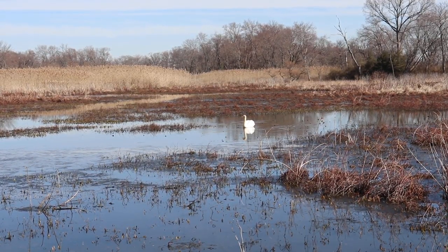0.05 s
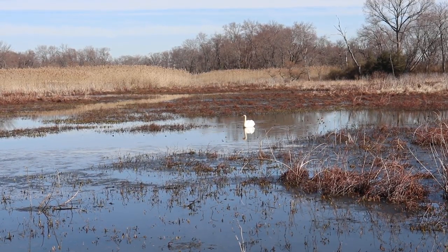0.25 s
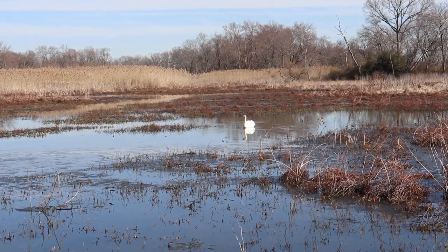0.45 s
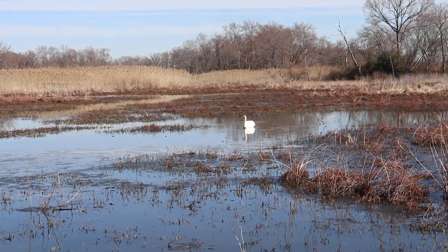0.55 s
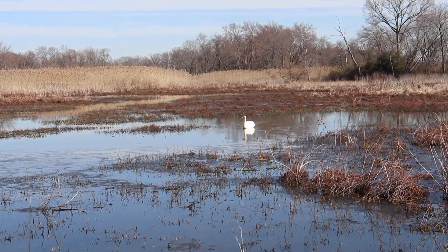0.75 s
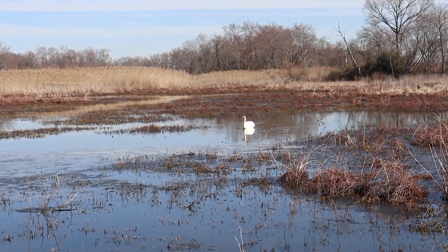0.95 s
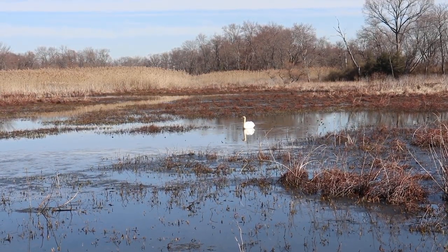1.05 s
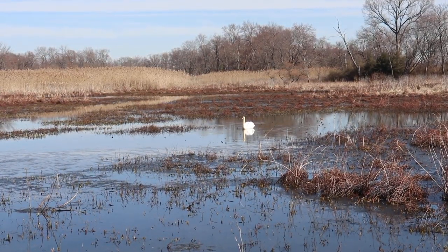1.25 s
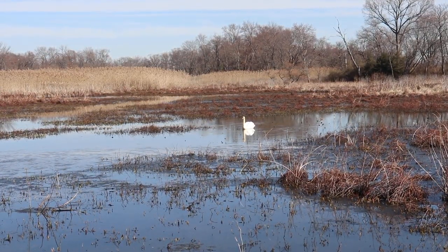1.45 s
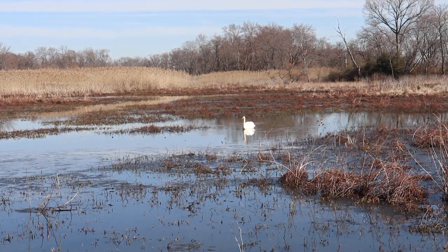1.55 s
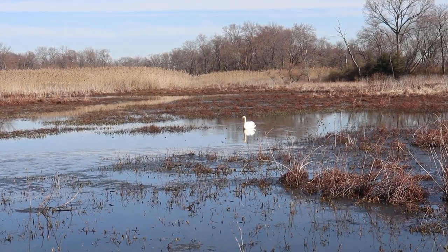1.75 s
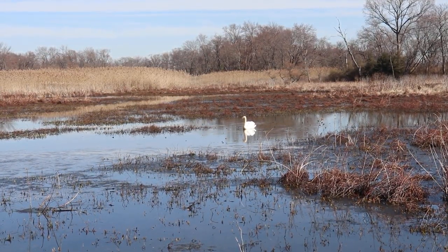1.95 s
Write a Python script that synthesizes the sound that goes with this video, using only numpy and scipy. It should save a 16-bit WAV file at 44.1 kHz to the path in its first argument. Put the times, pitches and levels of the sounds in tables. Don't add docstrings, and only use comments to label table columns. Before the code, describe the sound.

A swan gives one short rising nasal whoop that cracks into creaky pulses over a breezy marsh

```python
import sys
import numpy as np
from scipy import signal
from scipy.fft import rfft, irfft, next_fast_len
from scipy.io import wavfile
from scipy.ndimage import uniform_filter1d, map_coordinates

SR = 44100
rng = np.random.default_rng(int(sys.argv[2]) if len(sys.argv) > 2 else 0)


def store_wav(level_fs):
    pcm = np.round(np.clip(np.atleast_2d(level_fs), -1, 1) * 32767)
    wavfile.write(sys.argv[1], SR, pcm.T.astype(np.int16))


def natural_amplitude(level_db):
    exponent = np.asarray(level_db, float) / 20
    return 10 ** exponent


N = 88332

# time in seconds, level in dB.
VEHICLE_LEVEL = [
    (0.0, -38.5),
    (0.112, -41),
    (0.35, -40),
    (0.392, -40.5),
    (1.684, -52.5),
    (1.7, -55.5),
]
# frequency in Hz, density in dB per Hz.
TYRE_COLOUR = [(400, -31.5), (600, -12), (850, 2), (1100, -0.5), (1500, 0), (2000, -14.5), (2800, -33),
               (5000, -44)]
# frequency in Hz, left minus right in dB.
VEHICLE_PAN = [(300, -7), (700, 0), (1300, -6.5), (2400, -7)]
VEHICLE_LAG_S = 0.00028

# time in seconds, left level in dB, right level in dB.
BREEZE_LEVEL = [(0, -54, -54), (.18, -50, -50), (.3, -52, -52), (.4, -50, -50), (.55, -54, -54),
                (.64, -45, -45), (.75, -46, -44), (.81, -51, -51), (.87, -44, -49), (.96, -47, -47),
                (1.06, -46, -46), (1.13, -40, -41), (1.2, -39, -42), (1.27, -39, -43), (1.38, -36, -42),
                (1.5, -41, -42), (1.585, -41, -43), (1.605, -70, -68)]
# frequency in Hz, density in dB per Hz.
BUFFET_COLOUR = [(15, -13), (35, -15), (70, 3.5), (120, -1), (200, -5.5), (350, -19), (600, -39)]
# time in seconds, peak in dB, swing in Hz,
# length in seconds, left minus right in dB.
THUMP = [
    (1.1396, -17, 104, .013, 20),
    (1.1395, -14.5, 205, .0065, 24),
    (1.1394, -14.5, 340, .0012, 24),
]
# time in seconds, peak in dB, swing in Hz,
# length in seconds, left minus right in dB.
EDDIES = [
    (1.1, -27, 80, .007, 14),
    (1.2095, -21, 85, .006, 14),
    (1.329, -17.5, 100, .007, 18),
    (1.415, -25, 70, .007, 12),
    (1.457, -29, 70, .005, -8),
]

RUMBLE_DB, HISS_DB = -49.5, -58
# frequency in Hz, density in dB per Hz.
RUMBLE_COLOUR = [(45, -25), (90, -2.5), (160, 0), (260, -2), (400, -5.5), (700, -16.5), (1500, -26),
                 (3000, -30.5)]
# frequency in Hz, likeness from 0 to 1.
RUMBLE_ALIKE = [(100, 1), (350, 0.98), (1000, 0.2), (3000, 0.069)]
# frequency in Hz, density in dB per Hz.
HISS_COLOUR = [(1470, -30), (2500, 0), (4800, -1.5), (7970, -5), (10900, -10.5), (14200, -12.5),
               (15700, -14.5)]
RUMBLE_FOLLOWS = 0.18

# time in seconds, pitch in Hz.
PITCH = [
    (1.73, 240),
    (1.745, 250),
    (1.768, 318),
    (1.783, 362),
    (1.8, 371),
    (1.812, 437),
    (1.89, 672),
    (1.929, 797),
    (1.96, 681),
]
# time in seconds, level in dB, fundamental in dB, breath in dB.
EFFORT = [
    (1.73, -50.5, -14, -26),
    (1.76, -44.5, -14, -26),
    (1.785, -41.5, -18, -26),
    (1.803, -41, -14, -26),
    (1.825, -39.5, -11, -24),
    (1.865, -36.5, -7.5, -21),
    (1.905, -29, -17, -26.5),
    (1.926, -33.5, -26, -18.5),
    (1.945, -31, -7, -16),
]
# time in seconds, roughness from 0 to 1.
ROUGHNESS = [
    (1.73, .2),
    (1.78, .1),
    (1.793, .12),
    (1.803, .6),
    (1.815, .18),
    (1.83, .05),
    (1.95, .04),
    (1.957, .15),
]
# frequency in Hz, width in Hz, level in dB.
WINDPIPE = [(695, 153, 0), (956, 217, 3.5), (1317, 186, 5.5), (1500, 180, 3), (2010, 500, -7),
            (3020, 302, -7.5), (3840, 270, -16.5), (5370, 590, -12.5)]
# frequency in Hz, width in Hz, level in dB.
BEAK = [(1280, 890, -5), (2880, 580, -6), (5130, 1900, 4), (7130, 260, 6), (8430, 1340, 2.5),
        (12540, 1260, 1.5), (15300, 900, -6)]
BREATH_GATE = .6
DULL_HZ, BRIGHTER_HZ_PER_HZ, TILT_DB_PER_OCT = 900, 5.5, -3.5
FLICKER_DB, FLICKER_PER_S = .55, 60
WHOOP_END_S, RELEASE_S, ATTACK_S = 1.9545, .002, .004

# time in seconds, peak in dB, share of the low throat ring from 0 to 1.
CREAK = [
    (1.9600, -24, 0),
    (1.966, -24.5, 0),
    (1.9715, -25, 0.73),
    (1.9797, -22, 0.44),
    (1.9832, -30.5, 0),
    (1.9908, -14.5, 0.35),
    (2.0005, -28, 0.5),
]
# frequency in Hz, width in Hz, level in dB.
SLACK_THROAT = [(944, 190, 18), (1420, 124, 24.5), (2650, 310, 23), (5240, 420, -7)]
LOW_RING_HZ, LOW_RING_WIDTH_HZ = 497, 300
CREAK_SNAP_DB, CREAK_WIDTH_S = -4, .00011
CREAK_PUFF_DB, CREAK_PUFF_S = -32.5, 0.003

# frequency in Hz, left minus right in dB.
SWAN_PAN = [(500, -0.5), (1400, 0.2), (2800, -6), (5500, -3), (9000, -1.2), (13000, -3)]
# frequency in Hz, left lead in radians.
SWAN_LEAD = [(500, 0.084), (1400, 0.38), (2800, 0.63), (5500, 0.51), (9000, 0.82), (13000, 1.5)]
BIRD_FROM_HZ = 140
ECHO_DB, ECHO_T60_S = -17, .09


def unit(x):
    return x / np.sqrt(np.mean(x ** 2) + 1e-20)


def along(points, hz):
    f, v = np.transpose(points)
    return np.interp(np.log(hz + 1), np.log(f + 1), v)


def closed(points):
    below, above = (points[0][0] / 3, -90), (points[-1][0] * 3, -90)
    return lambda hz: natural_amplitude(along([below] + list(points) + [above], hz))


def curves(rows):
    s, *cols = np.transpose(rows)
    return [np.interp(np.arange(N) / SR, s, c) for c in cols]


def wobble(rate):
    knots = rng.standard_normal(int(N * rate / SR) + 4)
    return map_coordinates(knots, [np.arange(N) * rate / SR])


def filtered(x, response):
    m = next_fast_len(N + SR // 2)
    return irfft(rfft(x, m) * response(np.fft.rfftfreq(m, 1 / SR)), m)[..., :N]


def patchy(patchy_db, channels):
    z = signal.stft(rng.standard_normal((channels, N)), nperseg=512)[2]
    field = uniform_filter1d(rng.standard_normal(z.shape[1:]), size=4, axis=0)
    field = uniform_filter1d(field, size=10, axis=1)
    return signal.istft(z * natural_amplitude(patchy_db * unit(field)), nperseg=512)[1][:, :N]


def at_ports(x, pan, lead):
    side = np.array([[1], [-1]])

    def response(f):
        return natural_amplitude(side * along(pan, f) / 2) * np.exp(.5j * side * lead(f))
    return filtered(np.array([x, x]), response)


def vehicle():
    level_db, = curves(VEHICLE_LEVEL + [(5.7, VEHICLE_LEVEL[-1][1] - 2.5)])
    tyres = patchy(1.2, channels=1)[0]
    roar = unit(filtered(tyres, closed(TYRE_COLOUR))) * natural_amplitude(level_db + 2.0 + 0.44 * wobble(11.2))
    return at_ports(roar, VEHICLE_PAN, lambda f: -2 * np.pi * f * VEHICLE_LAG_S)


def breeze():
    lumps = natural_amplitude(1.2 * wobble(35) + 2.2 * np.array([wobble(45), wobble(45)]))
    shared = rng.standard_normal(N)
    flow = filtered(rng.standard_normal((2, N)) + .9 * shared, closed(BUFFET_COLOUR))
    out = unit(lumps * flow) * natural_amplitude(np.array(curves(BREEZE_LEVEL)))
    t = np.arange(N) / SR
    for s, db, hz, length, pan_db in THUMP + EDDIES:
        swing = -np.cos(2 * np.pi * hz * (t - s)) * np.exp(-.5 * ((t - s) / length) ** 2)
        out = out + natural_amplitude(db + np.minimum(0, [[pan_db], [-pan_db]])) * swing
    return out


def countryside():
    def mid_side(hz):
        turn = np.arccos(np.clip(along(RUMBLE_ALIKE, hz), -1, 1)) / 2
        return closed(RUMBLE_COLOUR)(hz) * [np.cos(turn), np.sin(turn)]

    def hiss_gain(hz):
        return natural_amplitude(along(HISS_COLOUR, np.maximum(hz, 2500))) * (hz > 300)

    mid, side = filtered(patchy(1.3, channels=2), mid_side)
    rumble = unit(np.array([mid + side, mid - side]))
    hiss = unit(filtered(patchy(1.0, channels=2), hiss_gain))
    fading_db = RUMBLE_FOLLOWS * (curves(VEHICLE_LEVEL)[0] - VEHICLE_LEVEL[0][1])
    return natural_amplitude(RUMBLE_DB + 2.5 + fading_db) * rumble + natural_amplitude(HISS_DB) * hiss


def ring(f, hz, width_hz):
    return 1j * f * width_hz / (hz * hz - f * f + 1j * f * width_hz)


def windpipe(f):
    return sum((-1) ** k * natural_amplitude(db) * ring(f, c, w) for k, (c, w, db) in enumerate(WINDPIPE))


def beak(f):
    return sum(natural_amplitude(db) * ring(f, c, w) ** 2 for c, w, db in BEAK)


def whoop():
    t = np.arange(N) / SR
    pitch, = curves(PITCH)
    level_db, first_db, breath_db = curves(EFFORT)
    rough, = curves(ROUGHNESS)
    pitch = uniform_filter1d(pitch, size=400) * (1 + .2 * rough * wobble(220) + .003 * wobble(60))
    phase = 2 * np.pi * np.cumsum(pitch) / SR

    start_s = EFFORT[0][0]
    on = slice(int((start_s - .01) * SR), N)
    k = np.arange(2, 24)[:, None]
    roll = 1 / (1 + (k * pitch[on] / (DULL_HZ + BRIGHTER_HZ_PER_HZ * pitch[on])) ** 4)
    flicker_db = FLICKER_DB * np.minimum(k - 1, 9) * np.array([wobble(FLICKER_PER_S)[on] for _ in k])
    strength = natural_amplitude(TILT_DB_PER_OCT * np.log2(k) + flicker_db) * roll
    overtones = (strength * np.cos(k * phase[on] + 0.058 * k * k)).sum(0)
    voice = np.zeros(N)
    voice[on] = overtones + natural_amplitude(first_db[on]) * np.cos(phase[on])

    breath = rng.standard_normal(N) * (1 + BREATH_GATE * np.cos(phase)) * natural_amplitude(1.2 * wobble(160))
    attack = np.clip((t - start_s) / ATTACK_S + 1, 0, 1)
    release = np.exp(-np.clip(t - WHOOP_END_S, 0, None) / RELEASE_S)
    size = natural_amplitude(level_db + 8 + 7 * rough * wobble(300) + .5 * wobble(70)) * attack * release
    return filtered(-size * voice, windpipe) + filtered(size * natural_amplitude(breath_db - 4.5) * breath, beak)


def creak():
    kicks, lows, puffs, t = np.zeros(N), np.zeros(N), np.zeros(N), np.arange(N) / SR
    for s, db, low in CREAK:
        kick = natural_amplitude(db) * np.exp(-.5 * ((t - s) / CREAK_WIDTH_S) ** 2)
        kicks -= kick
        lows -= np.clip(low, 0, 1) * kick
        puffs += natural_amplitude(db + CREAK_PUFF_DB + 11) * (t > s - .0004) * np.exp(-np.abs(t - s) / CREAK_PUFF_S)

    def throat(f):
        snap = natural_amplitude(CREAK_SNAP_DB) * ring(f, 1350, 2260)
        return snap + sum(natural_amplitude(db - 12.5) * ring(f, c, w) for c, w, db in SLACK_THROAT)

    low_ring = filtered(lows, lambda f: natural_amplitude(12.5) * ring(f, LOW_RING_HZ, LOW_RING_WIDTH_HZ))
    puff = filtered(puffs * rng.standard_normal(N), beak)
    return filtered(kicks - 0.47 * lows, throat) + low_ring + puff


def reeds(x):
    t = np.arange(SR // 4) / SR
    tail = rng.standard_normal((2, len(t))) * natural_amplitude(-60 * t / ECHO_T60_S) * (t > .004)
    return signal.fftconvolve(x[None], tail / np.linalg.norm(tail[0]), axes=1)[:, :N]


def swan():
    call = filtered(whoop() + creak(), lambda f: (1j * f / (BIRD_FROM_HZ + 1j * f)) ** 2)
    direct = at_ports(call, SWAN_PAN, lambda f: along(SWAN_LEAD, f))
    return direct + natural_amplitude(ECHO_DB) * reeds(call)


def scene():
    return vehicle() + breeze() + countryside() + swan()


def top_cut(x):
    return signal.sosfilt(signal.butter(12, 15820, fs=SR, output="sos"), x)


def record(dry):
    return top_cut(dry)


dry = scene()
out = record(dry)
store_wav(out)
```